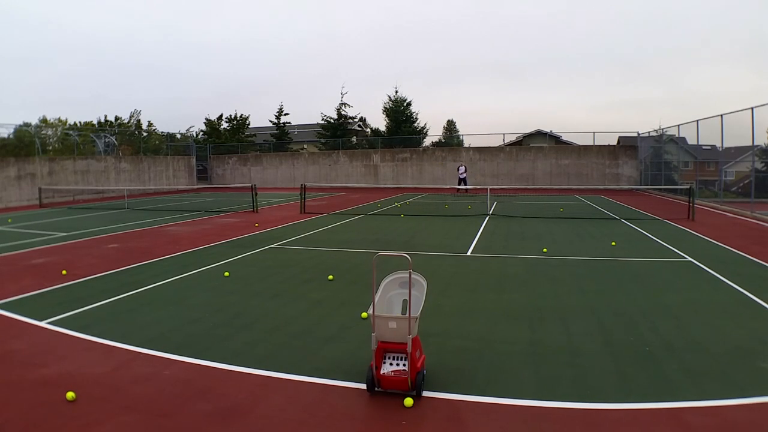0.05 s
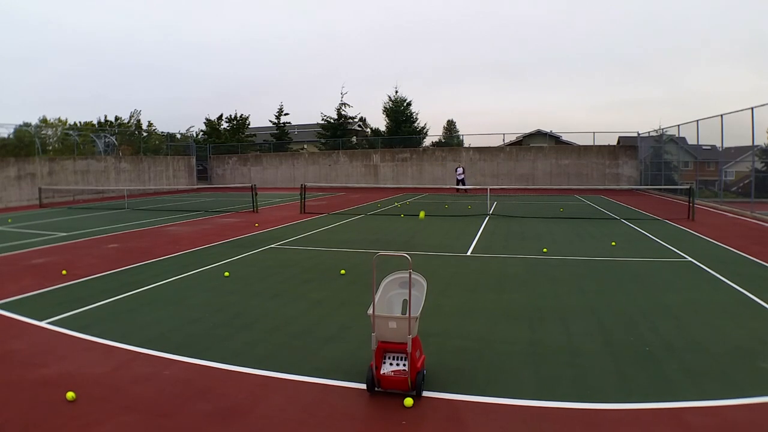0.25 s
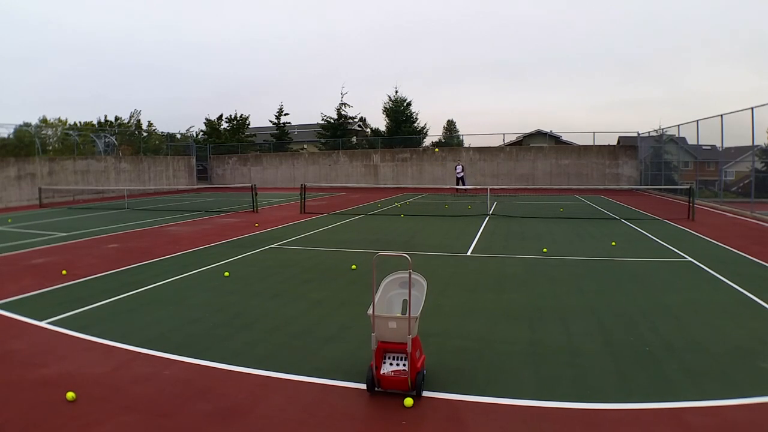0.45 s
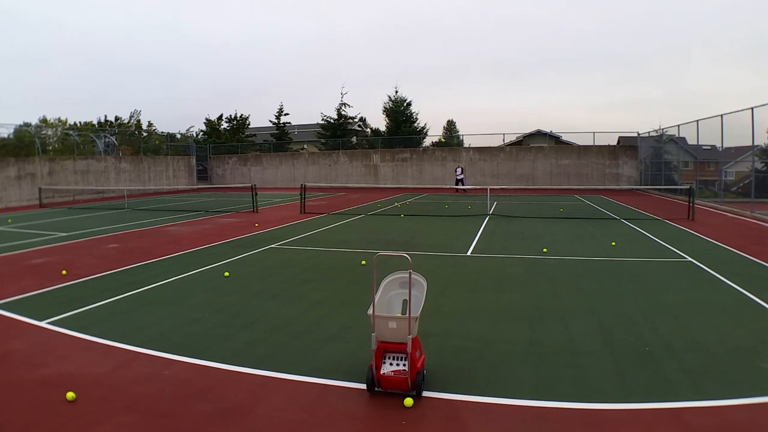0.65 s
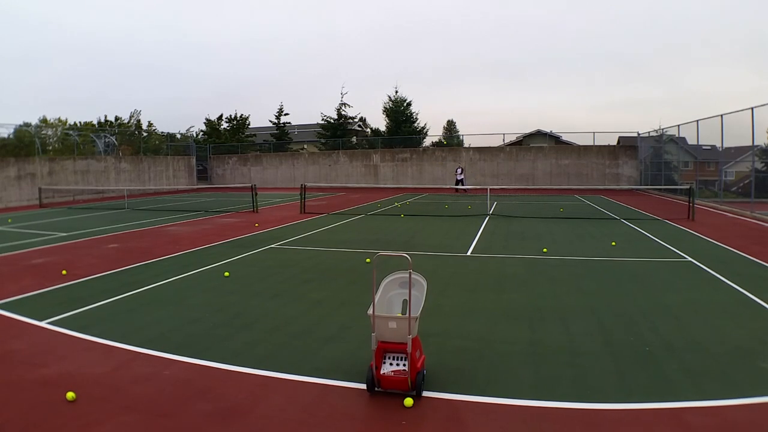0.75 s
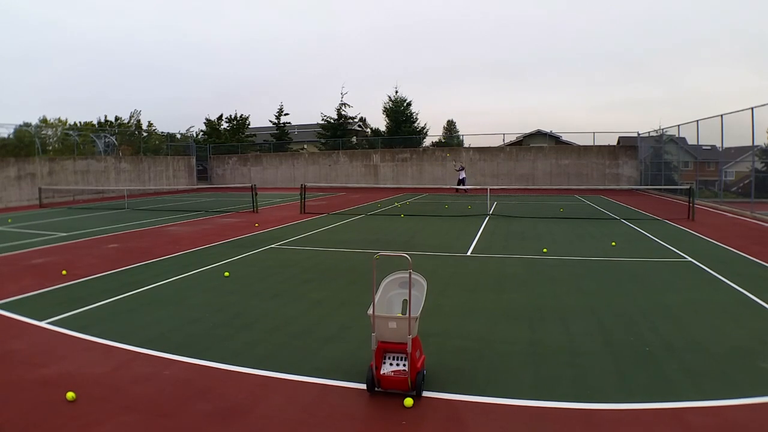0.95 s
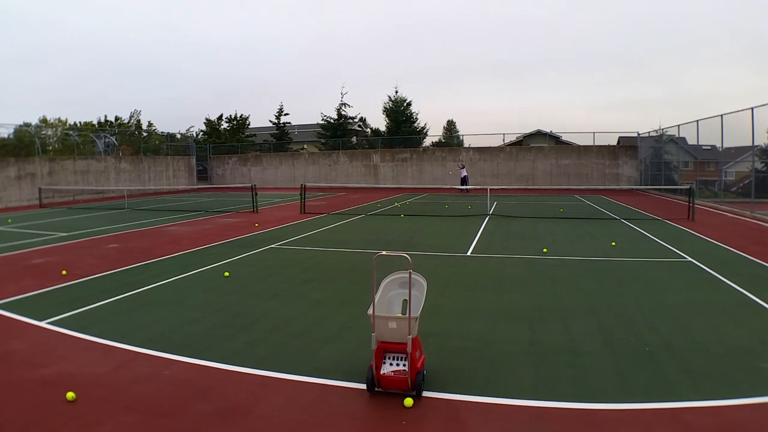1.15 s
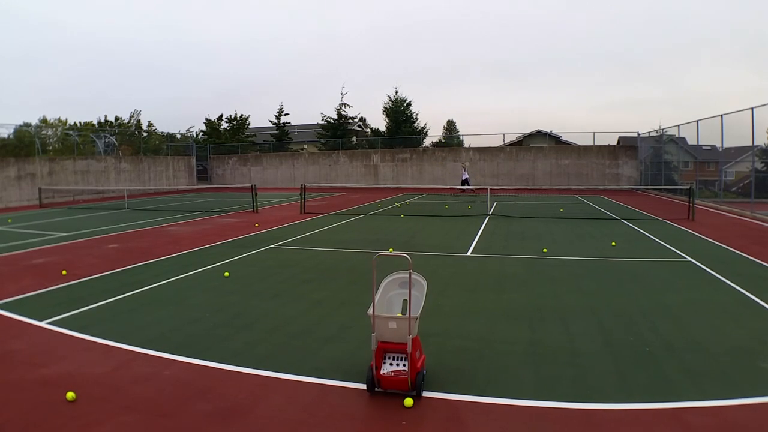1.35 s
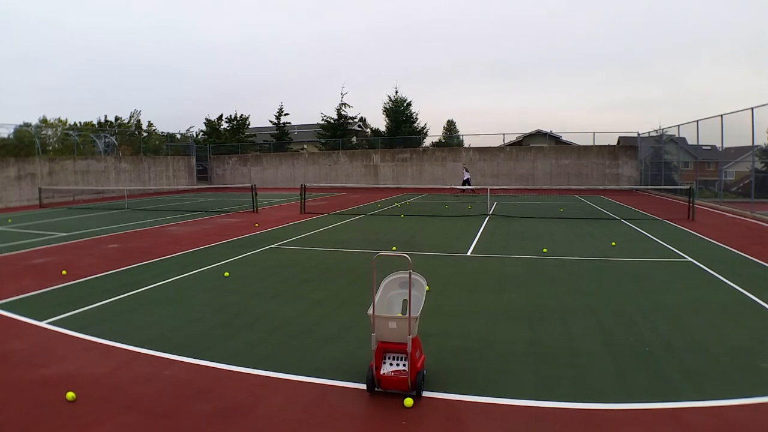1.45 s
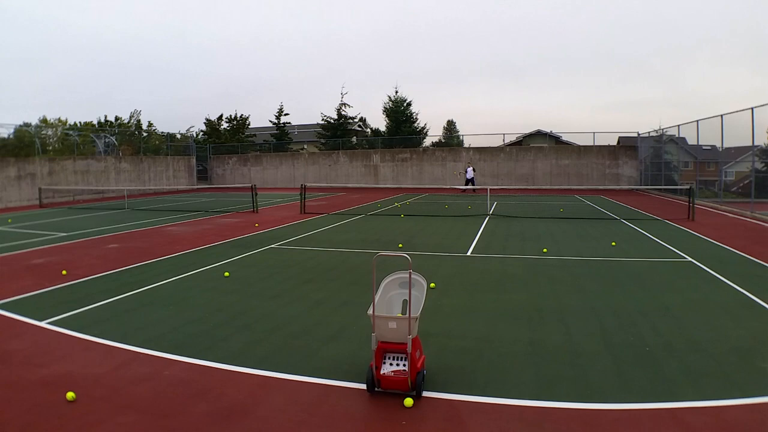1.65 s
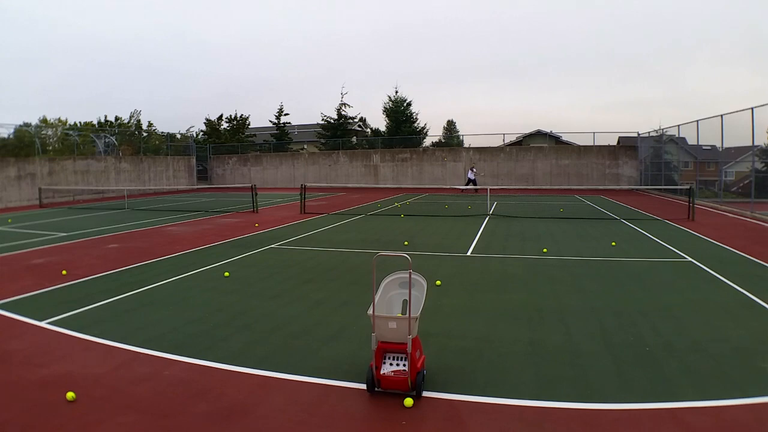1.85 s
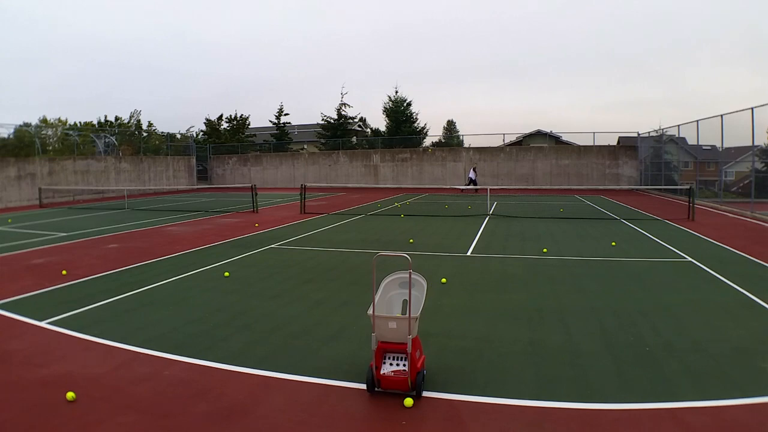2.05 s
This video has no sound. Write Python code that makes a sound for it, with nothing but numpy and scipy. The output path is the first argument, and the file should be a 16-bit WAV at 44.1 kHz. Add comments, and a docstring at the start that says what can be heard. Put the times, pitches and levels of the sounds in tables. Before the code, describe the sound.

A tennis ball machine pops once outdoors, hisses out air, and balls knock in its feeder.

```python
"""A ball machine hums on an outdoor tennis court, over a steady distant rumble.
A ball squeaks into the tube and fires with a hollow pop (0.23 s) that rings the tube and housing.
The shot echoes off the fence, then a valve lets out air in a long fading hiss (from 0.51 s).
A ball bounces nearby (1.55 s), and the valve gives a last faint whistle.
Finally, the next balls knock about in the plastic feeder (from 1.85 s)."""
import sys
import numpy as np
from scipy import signal
from scipy.fft import rfft, irfft
from scipy.io import wavfile

SR = 44100
rng = np.random.default_rng(int(sys.argv[2]) if len(sys.argv) > 2 else 0)


def digitize_waveform(pressure):
    """Quantize a signal to 16-bit integers and store it at the path in sys.argv[1].

    Rows of a 2-D input are taken as channels; values are limited to [-1, 1].
    """
    field = np.atleast_2d(pressure).T
    bounded = np.clip(field, -1, 1)
    quanta = np.round(bounded * 32767).astype(np.int16)
    wavfile.write(sys.argv[1], SR, quanta)


N = 92610
T = np.arange(N) / SR
FREQS_HZ = np.fft.rfftfreq(N, 1 / SR)


def amp(db):
    """Turns decibels into a number to multiply a sound by."""
    return 10 ** (np.asarray(db) / 20)


def unit(x):
    """Scales a sound to an average (rms) level of 1."""
    return x / np.sqrt(np.mean(x ** 2) + 1e-20)


def look_up(table, hz):
    """Reads a table at any pitch, sliding smoothly between its rows."""
    pitches, values = np.transpose(table)
    return np.interp(np.log(hz + 1), np.log(pitches + 1), values)


def colour(x, table):
    """Turns each pitch up or down by a table of pitch_hz, gain_db."""
    return irfft(rfft(x) * amp(look_up(table, FREQS_HZ)), N)


def noise(table):
    """Noise at level 1; the table only sets how strong the pitches are next to each other."""
    return unit(colour(rng.standard_normal(N), table))


def band(hz, width_hz):
    """Noise gathered around one pitch: the narrower, the more like a tone."""
    peak = 1 / (1 + (2 * (FREQS_HZ - hz) / width_hz) ** 2)
    return unit(irfft(rfft(rng.standard_normal(N)) * peak, N))


def burst(start_s, rise_s, fade_s, hold_s=0):
    """A loudness shape: rise, hold, die away. Here and below, fade_s is the time to drop 60 dB."""
    fading_for = np.maximum(T - start_s - rise_s - hold_s, 0)
    return np.clip((T - start_s) / rise_s, 0, 1) * 1000. ** (-fading_for / fade_s)


def ring(start_s, hz, fade_s):
    """One dying tone of something that has been struck."""
    age = np.maximum(T - start_s, 0)
    return np.sin(2 * np.pi * hz * age) * 1000. ** (-age / fade_s)


def push(at_s, hz):
    """A single push of air with a dip on either side; a higher pitch makes it shorter."""
    distance = (np.pi * hz * (T - at_s)) ** 2
    return (1 - 2 * distance) * np.exp(-distance)


def fade(x, start_s, table):
    """Lets each pitch die at its own speed, by a table of pitch_hz, fade_s."""
    hz, times, slices = signal.stft(x, SR, nperseg=256)
    gain = 1000. ** (-np.maximum(times - start_s, 0) / look_up(table, hz)[:, None])
    return signal.istft(slices * gain, SR, nperseg=256)[1][:N]


def waver(depth_db, rate_hz):
    """A random wobble in loudness, mostly slower than rate_hz."""
    return amp(depth_db * band(0, 2 * rate_hz))


# The distant rumble and the distant hiss. Columns: pitch_hz, relative_db
RUMBLE = [(12, -57), (20, -20.5), (81, -0.5), (166, -8.5), (228, -9.5), (436, -18.5), (484, -17.5),
          (573, -17), (623, -12), (784, -23.5), (1070, -20), (1170, -19), (3000, -29), (3900, -54),
          (6600, -120)]
FAR_HISS = [(900, 3), (1500, -5), (1950, 9.5), (2250, -26), (3200, -6), (5000, -16.5), (8500, -46),
            (11500, -29), (16000, -52)]
# The motor's tones. Columns: pitch_hz, level_db
MOTOR_TONES = [(78, -53), (117, -47), (160, -47), (463, -58), (635, -63.5), (877, -60.5), (1012, -55.5),
               (1965, -58)]


def background():
    """The motor hums in wavering tones over a steady distant rumble and hiss."""
    hum = sum(amp(db) * band(hz, width_hz=12.2) for hz, db in MOTOR_TONES)
    return amp(-39.5) * noise(RUMBLE) + amp(-48.5) * noise(FAR_HISS) + hum


# How long the court's echo lasts. Columns: pitch_hz, fade_s
COURT_FADE = [(150, 0.71), (1000, 0.5), (5000, 0.83), (12000, 0.39)]


def court_echo(x):
    """The fence and walls send a sound back as many thin, scattered echoes."""
    echoes_per_s, build_s = 2000, 0.0052
    echoes = rng.standard_normal(N) * (rng.random(N) < echoes_per_s / SR)
    tail = fade(echoes * np.clip(T / build_s, 0, 1), 0, COURT_FADE)
    return signal.fftconvolve(x, tail / np.linalg.norm(tail))[:N]


# Felt rubbing on plastic. Columns: pitch_hz, relative_db
FELT_SCUFF = [(500, 5.5), (1300, 2), (2200, -6.5), (2900, -6.5), (3400, -3), (4200, -10), (5800, -5),
              (8500, -31), (11500, -15.5), (13500, -33), (15500, -51)]
# Knocks in the feeder; ring_db and scuff_db count from the thud's level.
# Columns: start_s, level_db, thud_hz, ring_hz, ring_db, scuff_db, scuff_treble_db
FEEDER_KNOCKS = [(1.8500, -4.5, 380, 1043, -7.5, -23.5, 9), (1.8675, -38, 410, 990, -13, 2, 8),
                 (1.8713, -16, 403, 950, -8, -22, -6), (1.8806, -5, 335, 900, -13.5, -21, -1),
                 (1.9017, -17.5, 388, 780, -10, -21, 0), (1.9241, -8, 395, 1030, -6.5, -18, 2.5),
                 (1.9360, -20.5, 420, 960, -3, -20, -4), (1.942, -8, 380, 920, -13, -18, -5),
                 (1.9560, -16, 407, 630, -20, -30, -3), (2.0975, -19.5, 436, 1080, -2.5, -28, 0)]


def feeder_knocks():
    """Balls hit the feeder with a thud, a short plastic ring and a scuff, and roll between knocks."""
    scuff = noise(FELT_SCUFF)
    rolling = burst(1.865, rise_s=0.0071, fade_s=0.48, hold_s=0.057)
    out = amp(-42.5) * scuff * rolling * waver(depth_db=2.0, rate_hz=125)
    for at, db, thud_hz, ring_hz, ring_db, scuff_db, treble_db in FEEDER_KNOCKS:
        ring_start = at + 0.001594
        ring_shape = burst(ring_start, rise_s=0.0004, fade_s=0.014, hold_s=0.0019)
        plastic = amp(ring_db) * np.sin(2 * np.pi * ring_hz * (T - ring_start)) * ring_shape
        shell = amp(-11.5) * ring(at + 0.00097, hz=380, fade_s=0.023)
        rub = colour(scuff, [(4680, 0), (9220, treble_db)])
        felt = amp(scuff_db) * rub * burst(at - 0.003, rise_s=0.006, fade_s=0.007)
        out += amp(db) * (plastic + shell + felt - push(at, thud_hz))
    return out


# Ball bounces and thumps of the housing. Columns: start_s, thump_db, thump_hz, relative_click_db
THUMPS = [(.2430, -11, 510, -29), (.3370, -19.5, 213, -19), (0.3421, -27, 248, -17),
          (.5112, -16.5, 250, -47), (1.5206, -29.5, 254, -28.5), (1.5513, -14.5, 230, -11),
          (1.5547, -25, 450, -23), (1.5639, -23, 356, -21), (1.5700, -25, 260, -45),
          (1.6287, -26.5, 296, -41)]
# The tone of the click on contact. Columns: pitch_hz, gain_db
CONTACT_CLICK = [(200, -15), (550, -7), (800, 1), (1050, 13.5), (1350, 5), (1600, 3), (2500, -1),
                 (3400, -10.5), (4200, -22), (5500, -16), (8500, -46), (11500, -23), (15000, -46)]


def bounces_and_thumps():
    """Each hit is a click, then a soft low push as the ball flattens and springs back."""
    thumps, clicks = np.zeros(N), np.zeros(N)
    for at, db, hz, click_db in THUMPS:
        flatten_s = at + 0.0017
        spring_back = amp(-11) * push(flatten_s + 0.5 / hz, hz)
        thumps += amp(db) * (spring_back - push(flatten_s, hz))
        tick = 5 * (np.arange(N) == round(at * SR))
        fizz = 0.35 * rng.standard_normal(N) * burst(at, rise_s=0.0002, fade_s=0.018)
        clicks += amp(click_db) * (tick + fizz)
    return thumps + colour(clicks, CONTACT_CLICK)


# The escaping air, and the sharp spit as the valve opens. Columns: pitch_hz, relative_db
VENT_HISS = [(410, -10.5), (700, -12), (819, -8.5), (1020, 0.5), (1310, -2), (1500, -1.5), (2050, -4.5),
             (2220, -4.5), (2630, -7), (2880, -4.5), (4990, -12), (5690, -12), (8420, -21), (12200, -10),
             (13900, -15.5), (16000, -22)]
VALVE_SPIT = [(5000, -20), (9000, -38), (11800, 20), (14000, -10), (16000, -12)]
# Extra shaping that mainly thins the bass of the hiss. Columns: pitch_hz, gain_db
VENT_TONE = [(60, -28), (300, -2), (700, 2), (1000, -2), (16000, -1)]
# How long the hiss lasts. Columns: pitch_hz, fade_s
VENT_FADE = [(500, 0.84), (1200, 1.42), (3000, 2.1), (5700, 2.31), (9000, 1.93), (15000, 1.8)]
# The pitches at which the vent whistles. Columns: pitch_hz, width_hz, level_db, fade_s
VENT_WHISTLES = [(1079, 41, -31.5, 0.77), (5683, 160, -38.5, 2.14), (5880, 160, -39.5, 1.5)]
# The air leaves unevenly, above or below its steady fade. Columns: time_s, gain_db
VENT_SURGES = [(.52, -0.5), (.8, -0.5), (.92, -1.5), (1.02, 0.5), (1.14, 1.5), (1.28, -2), (1.42, -1),
               (1.54, -5), (1.63, 7.5), (1.71, 1.5), (1.8, 4.5), (2.05, 7)]


def air_vent():
    """A valve spits open; the hiss swells, then fades with the pressure. One quick echo colours it."""
    start_s, snap_s, swell_s, echo_s = 0.5085, 0.0022, 0.041, 0.00969
    age = np.maximum(T - start_s, 0)
    opening = np.clip(age / snap_s, 0, 1) * (1 - 0.15 * np.exp(-age / swell_s))
    hiss = amp(-23.5) * fade(colour(noise(VENT_HISS), VENT_TONE), start_s, VENT_FADE) * opening
    whistles = sum(amp(db) * band(hz, width_hz) * burst(start_s, swell_s, fade_s)
                   for hz, width_hz, db, fade_s in VENT_WHISTLES)
    spit = amp(-33.5) * noise(VALVE_SPIT) * burst(start_s, snap_s, fade_s=0.067)
    surges = amp(np.interp(T, *np.transpose(VENT_SURGES)))
    air = (hiss + whistles + spit) * waver(depth_db=0.35, rate_hz=45) * surges
    echo = amp(-13.5) * np.pad(air, (round(echo_s * SR), 0))[:N]
    return air + echo


def closing_whistle():
    """The valve whistles faintly once more as it closes."""
    return amp(-59.5) * band(5720, width_hz=190) * burst(1.585, rise_s=0.05, fade_s=0.3)


# The noisy parts of the shot. Columns: pitch_hz, relative_db
HOUSING_SHUDDER = [(60, -24), (130, 3.5), (220, -10), (500, -14), (1200, -31), (4000, -75)]  # the housing shakes as pressure builds
BALL_SQUEAK = [(300, -7), (1000, 0), (1450, 8), (1900, -1), (2800, -5.5), (4500, -8), (8500, -31),
               (10300, -26), (11100, -6), (12500, -22), (16000, -36)]  # the ball squeezes into the tube
AIR_BLAST = [(60, -35), (150, 10.5), (450, -0.5), (700, -12), (1000, -11), (2000, -18), (4000, -26),
             (5500, -32.5), (8500, -52), (11300, -45), (13500, -52), (15000, -77)]  # air bursts out with the ball
BLAST_TAIL = [(60, -30), (140, 0), (350, -3), (700, -13), (1100, -19.5), (2000, -29.5), (4000, -28),
              (5500, -36), (8500, -55), (11300, -47.5), (13500, -55), (15000, -75)]  # the low rush that lingers
FENCE_SLAP = [(100, -25), (400, -3), (750, 7), (1100, -2.5), (1400, -10), (3000, -17), (7000, -35),
              (12000, -69)]  # the shot comes back off the fence
# How long the blast lasts; its bass outlasts its treble. Columns: pitch_hz, fade_s
BLAST_FADE = [(180, 0.21), (400, 0.11), (700, 0.15), (1500, 0.17), (4000, 0.088), (12000, .15)]
# The ringing tones of the tube and housing. Columns: pitch_hz, level_db, fade_s
TUBE_TONES = [(119.7, -27, 0.83), (158, -23, 0.44), (187.5, -23, 0.81), (290, -31, 0.44),
              (334.4, -22, 0.39), (415, -19.5, 0.36), (557, -20, 0.16), (633.5, -20.5, 0.27),
              (825, -22.5, 0.15), (1072, -25, 0.12), (1157, -42, 0.11), (1570, -34.5, 0.2)]


def shot():
    """The ball squeezes in, pops out in a blast of air, and leaves the tube and housing ringing."""
    pop_s, build_s, blast_hold_s = 0.2282, 0.088, 0.03
    boom_hz, boom_width_s = 168, 0.0037  # the short low swell around the pop
    since_pop = T - pop_s
    shudder = amp(-25.5) * noise(HOUSING_SHUDDER) * burst(pop_s - build_s, build_s, fade_s=0.051)
    squeak = amp(-34) * noise(BALL_SQUEAK) * burst(0.1901, rise_s=0.0074, fade_s=0.34)
    boom = np.cos(2 * np.pi * boom_hz * since_pop) * np.exp(-(since_pop / boom_width_s) ** 2 / 2)
    pop = amp(-4) * push(pop_s, hz=380) + amp(-12) * boom
    # every second tone starts by swinging the opposite way
    tube = sum((-1) ** k * amp(db) * ring(pop_s, hz, fade_s)
               for k, (hz, db, fade_s) in enumerate(TUBE_TONES))
    blast_rise = np.clip(since_pop / 0.002, 0, 1)
    blast = amp(-13.5) * fade(noise(AIR_BLAST), pop_s + blast_hold_s, BLAST_FADE) * blast_rise
    tail = amp(-25.5) * noise(BLAST_TAIL) * burst(pop_s, rise_s=0.049, fade_s=0.97)
    slap = amp(-29.5) * noise(FENCE_SLAP) * burst(0.357, rise_s=0.01, fade_s=0.22)
    return shudder + squeak + pop + tube + blast + tail + slap


def scene():
    """Adds up all the sounds straight ahead, the same on the left and the right."""
    hits = bounces_and_thumps() + feeder_knocks()
    mix = background() + shot() + hits + amp(-13.5) * court_echo(hits) + air_vent() + closing_whistle()
    return np.tile(mix, (2, 1))


# How much louder the left microphone is than the right. Columns: pitch_hz, left_minus_right_db
MIC_BALANCE = [(600, 0), (1400, .5), (2300, 0.6), (3300, 4), (4600, 8), (5800, 10), (7200, 6), (9300, -3),
               (11800, -3), (14000, 0.5), (16000, 0)]


def record(dry):
    """Two microphones hear the treble unequally; peaks stop at full scale; the highest treble is cut."""
    left_over_right = amp(look_up(MIC_BALANCE, FREQS_HZ))
    gains = 2 * np.array([left_over_right, np.ones_like(left_over_right)]) / (1 + left_over_right)
    heard = np.clip(irfft(rfft(dry) * gains, N), -1, 1)
    top_hz = 16000
    treble_cut = signal.firwin(511, top_hz, window=("kaiser", 9), fs=SR)
    return signal.oaconvolve(heard, treble_cut[None], "same")


dry = scene()
out = record(dry)
digitize_waveform(out)
```